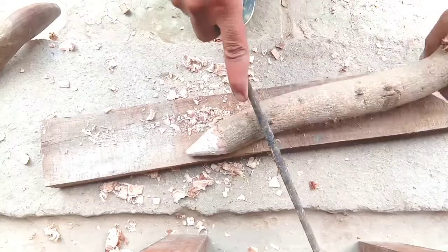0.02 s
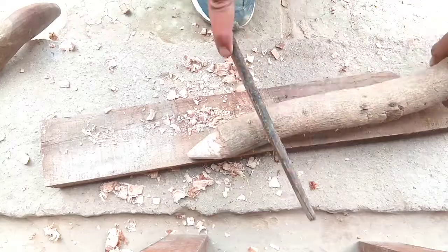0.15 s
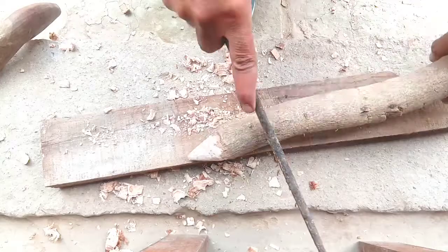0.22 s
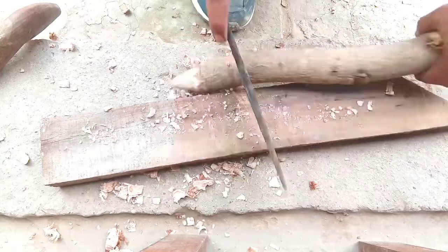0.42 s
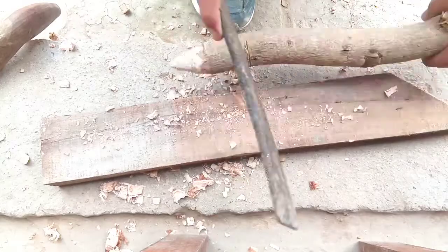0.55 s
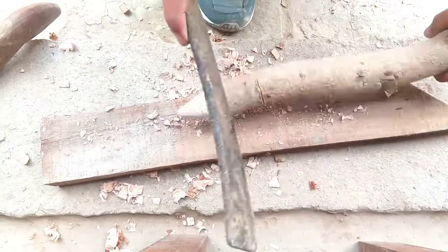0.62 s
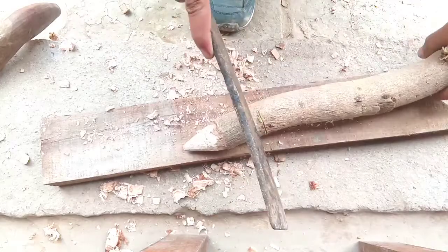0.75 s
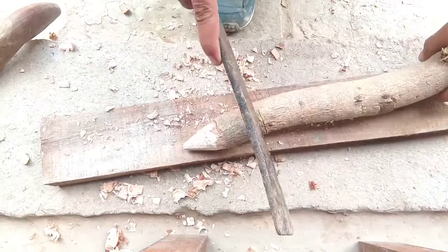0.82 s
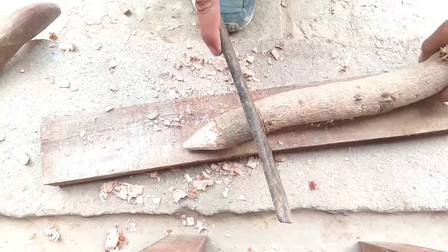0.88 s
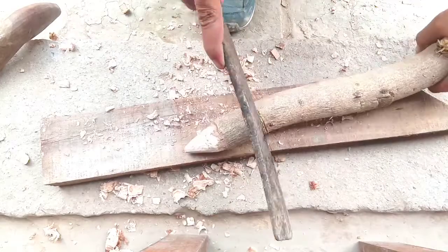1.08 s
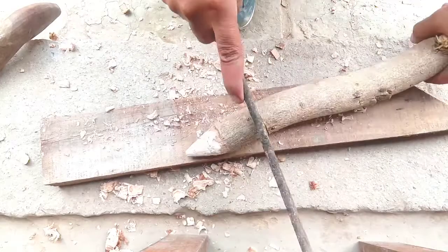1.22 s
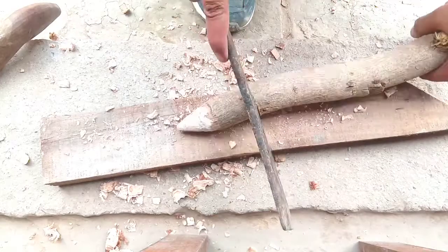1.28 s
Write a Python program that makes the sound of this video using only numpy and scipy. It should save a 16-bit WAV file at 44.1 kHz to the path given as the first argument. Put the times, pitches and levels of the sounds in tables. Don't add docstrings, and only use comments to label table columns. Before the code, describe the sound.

A flat metal blade scrapes and shaves a wooden stick in short strokes, with a sharp knock

```python
import sys
import numpy as np
from scipy import signal
from scipy.fft import rfft, irfft, next_fast_len
from scipy.io import wavfile
from scipy.ndimage import map_coordinates

SR = 44100
rng = np.random.default_rng(int(sys.argv[2]) if len(sys.argv) > 2 else 0)


def to_wav(s):
    ch = np.atleast_2d(s).T
    pcm = np.round(np.clip(ch, -1, 1) * 32767)
    wavfile.write(sys.argv[1], SR, pcm.astype(np.int16))


def magnitude_from_level(level_db):
    exponent = np.asarray(level_db, float) / 20
    return 10 ** exponent


N = 59535
T = np.arange(N) / SR


def unit(x):
    return x / np.sqrt(np.mean(x ** 2) + 1e-20)


def filtered(x, response):
    size = next_fast_len(N + SR // 4)
    hz = np.fft.rfftfreq(size, 1 / SR) + 1
    return irfft(rfft(x, size) * response(hz), size)[..., :N]


def colour(points):
    point_hz, level_db = np.transpose(points)
    return lambda hz: magnitude_from_level(np.interp(np.log(hz), np.log(point_hz), level_db))


def wobble(knots_per_s):
    knots = rng.standard_normal(int(1.4 * 400) + 8)
    return map_coordinates(knots, [T * min(knots_per_s, 400)])


def clicks(per_s, spread_db):
    chance = rng.random(N)
    size = np.minimum(rng.exponential(size=N), 3.5)
    gate = np.clip((per_s / SR - chance) * SR / 200, 0, 1)
    return unit(gate * magnitude_from_level(spread_db * size) * rng.standard_normal(N))


def pressure(table):
    bite_db, onset_db_per_s = 12, 5000
    power = np.zeros(N)
    for start_s, rise_s, hold_s, level_db, fall_db_per_s in table:
        t = T - start_s
        swell_db = -bite_db * np.clip(1 - t / rise_s, 0, 1) - onset_db_per_s * np.clip(-t, 0, None)
        ease_db = fall_db_per_s * np.clip(t - rise_s - hold_s, 0, None)
        power += magnitude_from_level(level_db + swell_db - ease_db) ** 2
    return np.sqrt(power)


# start in seconds, rise in seconds, hold in seconds, level in dB, fall in dB/s.
STROKES = [
    (-.02, 0.0099, 0.019, -34, 348),
    (.157, 0.001, 0.0055, -38.5, 600),
    (.195, 0.0047, .03, -34, 544),
    (.4, 0.0091, 0.02, -33, 1300),
    (.582, 0.037, 0.065, -37.5, 701),
    (.835, .04, 0.021, -40.5, 336),
    (1.016, 0.005, .038, -41.5, 257),
    (1.18, 0.008, 0.036, -38, 355),
]
# start in seconds, rise in seconds, hold in seconds,
# level in dB, fall in dB/s.
DRAGS = [(.07, 0.017, 0.054, -55.5, 300), (.13, 0.0059, 0.0047, -46.5, 300),
         (.175, .004, 0.017, -53.5, 300), (.25, 0.0076, 0.029, -49, 497), (.322, 0.0067, 0.023, -47.5, 500),
         (.38, 0.0047, 0.015, -47.5, 540), (.44, .005, 0.03, -52.5, 360),
         (.555, 0.0015, 0.0067, -48.5, 300), (.742, 0.0066, 0.0094, -58.5, 265),
         (.93, .01, 0.062, -63.5, 300), (1.165, 0.0054, 0.0086, -53.5, 500), (1.25, 0.014, .1, -48, 100)]
# frequency in Hz, density in dB per Hz.
FIBRES = [(300, -10.5), (800, -11.5), (2000, -6), (4000, -3), (6300, 0.5), (8500, -5.5), (11000, -12.5),
          (15800, -12.5)]
# frequency in Hz, density in dB per Hz.
DRAG = [(400, -18), (1500, 0.5), (3000, 1), (5000, 1), (6500, 0.5), (8000, -12), (10000, -17), (15800, -20)]
# time in seconds, treble gain in dB.
KEEN = [
    (0, -4.5),
    (.2, 5),
    (.42, -0.5),
    (.64, 5),
    (.87, 9),
    (1.2, 6),
]


def shaving():
    tears_per_s, tear_db, smooth_share = 5030, 3.5, 0.57
    crackle = np.sqrt(1 - smooth_share) * clicks(tears_per_s, tear_db)
    hiss = np.sqrt(smooth_share) * rng.standard_normal(N)
    cut = unit(filtered((crackle + hiss) * magnitude_from_level(1.1 * wobble(180)), colour(FIBRES)))
    treble = filtered(cut, lambda hz: 1 / (1 + (10000 / hz) ** 6))
    time_s, keen_db = np.transpose(KEEN)
    cut = cut + treble * (magnitude_from_level(np.interp(T, time_s, keen_db)) - 1)
    rough = rng.standard_normal(N) * magnitude_from_level(1.6 * wobble(140))
    drag = unit(filtered(rough, colour(DRAG)))
    return pressure(STROKES) * cut + pressure(DRAGS) * drag


# frequency in Hz, width in Hz, level in dB.
WOOD = [(330, 81, 7.5), (480, 116, 8), (625, 122, 3.5), (944, 207, -0.5), (1170, 40, 9), (1335, 310, 0),
        (1748, 95, 0.5), (1970, 120, -2.5), (2093, 110, 3), (2290, 280, -1), (1495, 28, -3)]


def wood_modes(hz):
    total = 0
    for k, (mode_hz, width_hz, level_db) in enumerate(WOOD):
        damping = 1j * hz * width_hz
        total = total + (-1) ** k * magnitude_from_level(level_db) * damping / (mode_hz ** 2 - hz ** 2 + damping)
    return total


# start in seconds, length in seconds, level in dB, centre in Hz,
# spread in octaves.
RUBS = [(0, 0.032, -42.5, 1500, 0.55), (0.024, 0.38, -58, 1420, 0.67), (0.047, 0.25, -61.5, 330, 0.22),
        (0.153, 0.046, -49, 447, 0.59), (0.157, 0.06, -54.5, 1250, 0.12), (0.186, 0.075, -54.5, 1460, 0.66),
        (0.398, 0.045, -45.5, 253, 0.13), (0.269, 0.041, -52, 1420, .8), (0.323, 0.046, -47.5, 2210, 0.13),
        (0.328, 0.044, -53.5, 405, 0.9), (0.383, 0.02, -43.5, 2040, 0.45), (0.398, 0.022, -37, 1500, 0.7),
        (0.42, 0.018, -40, 1700, 0.8), (0.438, 0.029, -33, 1680, 0.74), (0.455, 0.045, -32.5, 1770, 0.65),
        (0.486, 0.058, -54.5, 1870, 0.22), (0.555, 0.024, -39.5, 1150, 0.73), (0.556, 0.022, -42, 480, .6),
        (0.583, 0.035, -46, 668, .2), (0.49, 0.06, -55, 540, .4), (0.75, 0.07, -62, 1000, .8),
        (0.658, 0.063, -36.5, 1440, 1.36), (0.696, 0.06, -51.5, 590, 1.3), (0.97, 0.14, -62.5, 2330, 0.27),
        (1.04, 0.037, -61.5, 640, 0.36), (1.263, 0.036, -48, 1560, 1.04), (1.211, 0.35, -64, 1520, 0.11),
        (1.325, 0.035, -56, 1170, 0.5)]


def rubbing():
    slips_per_s, slip_db, fall_db, wood_top_hz = 2575, 2, 13.5, 2750
    slips = clicks(slips_per_s, slip_db) + 0.63 * rng.standard_normal(N)
    start_s, length_s, level_db, centre_hz, octaves = np.transpose(RUBS)[:, :, None]
    t = T - start_s
    shape = np.clip(t / 0.0017, 0, 1) * magnitude_from_level(-fall_db * (t / length_s) ** 2)

    def touched_wood(hz):
        near = (1 + (np.log2(hz / centre_hz) / octaves) ** 2) ** -0.83
        return wood_modes(hz) * near / (1 + (hz / wood_top_hz) ** 8)

    rings = filtered(shape * slips, touched_wood)
    power = np.sum(rings ** 2, axis=1, keepdims=True) / (length_s * SR)
    return np.sum(magnitude_from_level(level_db) * rings / np.sqrt(power + 1e-20), axis=0)


# start in seconds, peak in dB, mode in Hz, swell in seconds.
JOLTS = [(0.049, -37, 7100, 0.001), (.157, -44, 5160, 0.0014), (0.169, -40, 380, 0.00071),
         (.325, -38.5, 1150, 0.0016), (0.344, -33, 1145, 0.0036), (.391, -36, 2300, 0.002),
         (.3988, -20.5, 2086, 0.0016), (.3985, -24, 690, 0.0014), (.4359, -8, 2110, 0.0013),
         (.4358, -14, 1296, 0.0011), (.4336, -20, 1780, 0.0007), (.4422, -22, 1950, 0.0007),
         (0.4, -25, 2170, 0.0014), (.463, -22, 2030, 0.0028), (.468, -32, 2240, 0.0023),
         (.405, -21, 2140, 0.001), (.466, -28, 128, 0.007), (.475, -30, 200, .002),
         (.5605, -25.5, 486, 0.00085), (0.5675, -28.5, 1170, 0.0016), (.6562, -25.5, 1366, 0.0012),
         (.673, -26, 325, 0.0045), (.436, -24, 500, 0.0011), (0.277, -41, 115, 0.005),
         (0.12, -51, 145, 0.0095), (1.046, -34, 254, 0.00098), (1.269, -39, 1160, 0.0029),
         (1.274, -38, 2190, 0.0018),
         (.136, -37, 139, .003), (.158, -42, 1300, .001), (.165, -36.5, 494, 0.0021),
        (.173, -37.5, 403, .002), (.198, -43, 1800, .001), (.208, -42, 182, 0.0057),
        (.21, -45, 1270, 0.0044), (.279, -36, 202, .0025), (.335, -44, 2110, .003), (.348, -42, 2246, .004),
        (.4005, -33, 3950, .0006), (.402, -29, 262, 0.0018), (.408, -29, 2000, 0.0019),
        (0.4357, -24.5, 3100, 0.00045), (.436, -23, 824, 0.0011), (.458, -29, 1920, .0015),
        (.481, -31, 1950, .002), (.464, -30, 998, 0.0028), (.5545, -33, 1220, .001),
        (.558, -30, 347, 0.0031), (.56, -40.5, 1800, .002), (.6565, -32, 2050, 0.0014),
        (.656, -35, 3300, 0.00062), (.668, -34, 474, 0.0019), (.676, -30, 900, .0028),
        (.68, -33, 2440, .003), (.703, -41, 2397, .002), (.706, -38, 1270, 0.0026),
        (.745, -42.5, 228, 0.0037), (.811, -51.5, 960, .002), (.974, -52, 2090, .002),
        (1.002, -51, 2190, 0.0026), (1.275, -41, 480, 0.0012), (1.284, -38, 1500, .0004),
        (1.286, -48, 1500, 0.0057), (1.33, -44, 1180, .006), (1.333, -46.5, 480, .003)]


def jolts():
    out = np.zeros(N)
    for start_s, peak_db, mode_hz, swell_s in JOLTS:
        u = np.clip(T - start_s, 0, None) / swell_s * 2
        shape = (u / 4) ** 4 * np.exp(4 - u)
        out += magnitude_from_level(peak_db) * shape * np.sin(2 * np.pi * mode_hz * (T - start_s))
    return out


# time in seconds, pitch in Hz, level in dB.
SING = [
    (.82, 1082, -66),
    (.845, 1122, -58),
    (.89, 1139, -58),
    (.914, 1170, -52),
    (.94, 1160, -54),
    (.957, 1122, -57),
    (.98, 1165, -57),
    (1.015, 1150, -63),
]
# time in seconds, rise in dB, width in seconds.
GRIPS = [
    (.845, 5.5, .004),
    (.86, 7, .005),
    (.879, 4, .005),
    (.895, 6, .003),
    (.911, 7, .005),
    (.921, 8, .006),
    (.94, 13, 0.0036),
    (.955, 9, 0.0036),
    (.977, 9, .007),
    (.997, 8, .007),
]


def singing():
    partner_ratio, partner_db, rough_db = 1.5, -11, 1.4
    time_s, pitch_hz, level_db = np.transpose(SING)
    phase = 2 * np.pi * np.cumsum(np.interp(T, time_s, pitch_hz)) / SR
    grip_db = sum(rise_db * np.exp(-((T - at_s) / width_s) ** 2) for at_s, rise_db, width_s in GRIPS)
    level = magnitude_from_level(np.interp(T, time_s, level_db, left=-120, right=-120) + grip_db)
    note = magnitude_from_level(rough_db * wobble(90.4)) * np.sin(phase + 0.55 * wobble(70))
    partner_phase = partner_ratio * phase + 0.9 * wobble(79.7)
    partner = magnitude_from_level(partner_db + 3.5 * wobble(60.7)) * np.sin(partner_phase)
    return level * (note + partner)


def skid():
    start_s, length_s, pitch_hz, drop_hz, level_db = 1.232, 0.04, 3520, 1100, -48
    u = np.clip((T - start_s) / length_s, 0, 1)
    shape = np.sin(np.pi * u ** 0.8) * magnitude_from_level(level_db + 2.1 * wobble(200))
    return shape * np.sin(2 * np.pi * np.cumsum(pitch_hz - drop_hz * u ** 3) / SR)


def squeak():
    start_s, length_s, pitch_hz, level_db = 0.832, 0.015, 11150, -50
    flutter, flutter_hz = 0.3, 170
    t = T - start_s
    u = t / length_s
    shape = np.clip(8 * u, 0, 1) * magnitude_from_level(-25 * np.clip(u - 0.8, 0, None))
    shape = shape * (1 + flutter * np.sin(2 * np.pi * flutter_hz * t))
    return magnitude_from_level(level_db) * shape * np.sin(2 * np.pi * (pitch_hz * T + 0.15 * wobble(298)))


# start in seconds, rise in seconds, hold in seconds, level in dB, fall in dB/s.
WHISKS = [
    (.742, 0.0067, 0.016, -52, 300),
    (.79, .01, .03, -60.5, 300),
]
# frequency in Hz, density in dB per Hz.
WHISK = [(2500, -30), (4200, -10), (5000, 1), (6500, 0), (8500, -6), (11000, -16), (15800, -20)]


def whisking():
    brush = rng.standard_normal(N) * magnitude_from_level(2.9 * wobble(150))
    return pressure(WHISKS) * unit(filtered(brush, colour(WHISK)))


# time in seconds, level in dB.
HUM = [(0, -49.5), (.13, -46), (.2, -50.5), (.29, -46), (.385, -49), (.405, -39), (.48, -31), (.52, -41.5),
       (.62, -53), (.68, -56), (.72, -46.5), (.77, -53), (.8, -51), (1.22, -48.5), (1.31, -44.5)]
# frequency in Hz, density in dB per Hz.
PLANK = [(20, -28), (50, -15.5), (95, -9), (125, -2), (170, -10), (300, -21.5), (600, -55)]


def hum():
    time_s, level_db = np.transpose(HUM)
    lumps = magnitude_from_level(1.5 * wobble(59.73)) * rng.standard_normal(N)
    return magnitude_from_level(np.interp(T, time_s, level_db)) * unit(filtered(lumps, colour(PLANK)))


def ground_echo(near):
    t60_s, level_db, delay_samples = 0.16, -15, 100
    tail = rng.standard_normal(SR // 5) * magnitude_from_level(-60 * T[:SR // 5] / t60_s)
    tail = np.pad(tail / np.linalg.norm(tail), (delay_samples, 0))
    return magnitude_from_level(level_db) * signal.fftconvolve(near, tail)[:N]


# frequency in Hz, density in dB per Hz.
AIR = [(120, -13.5), (200, -12), (359, -19.5), (732, -17.5), (1060, -16), (3050, -32.5), (7200, -27.5),
       (15800, -56)]


def air():
    level_db = -56.5 + 2.8 * wobble(11.65)
    return magnitude_from_level(level_db) * unit(filtered(rng.standard_normal(N), colour(AIR)))


def scene():
    near = shaving() + rubbing() + jolts() + singing() + skid() + squeak()
    return (near + ground_echo(near) + whisking() + hum() + air())[None]


def roll_off(x):
    return signal.sosfilt(signal.butter(12, 16720, fs=SR, output="sos"), x)


def record(dry):
    top_hz = 15700
    mix = filtered(dry, lambda hz: hz < top_hz)
    return roll_off(mix)


dry = scene()
out = record(dry)
to_wav(out)
```